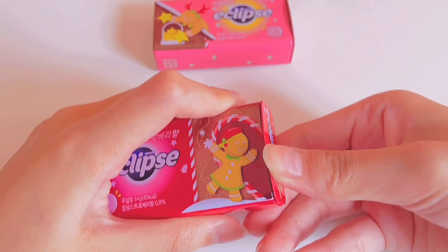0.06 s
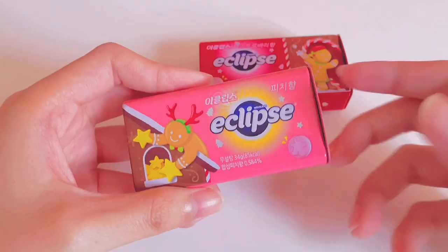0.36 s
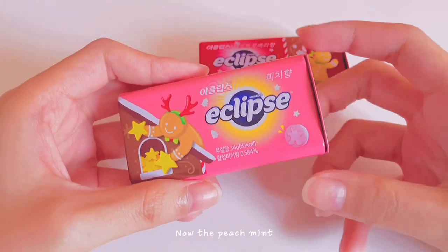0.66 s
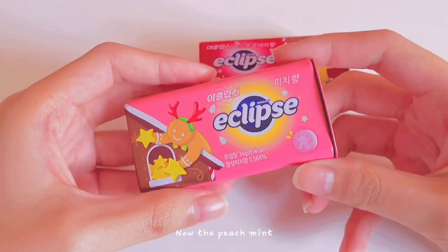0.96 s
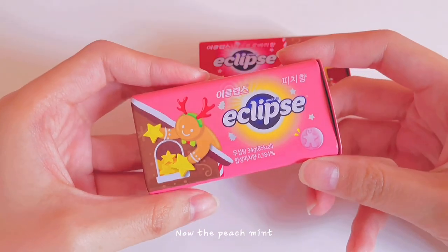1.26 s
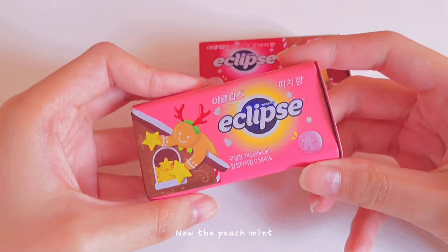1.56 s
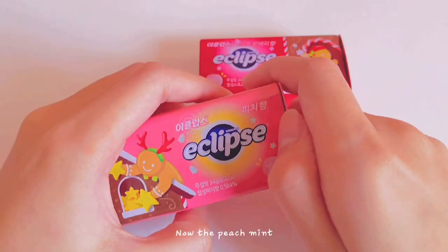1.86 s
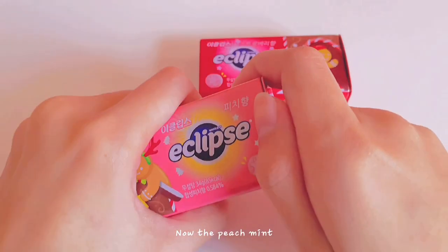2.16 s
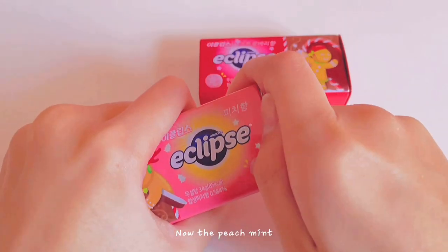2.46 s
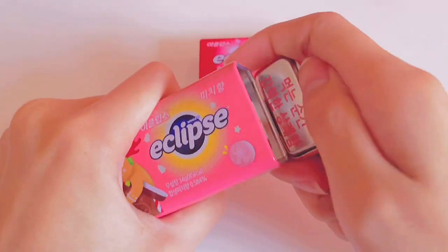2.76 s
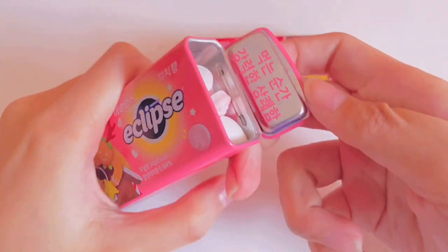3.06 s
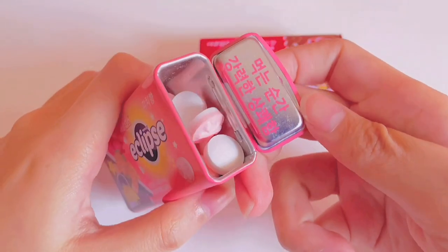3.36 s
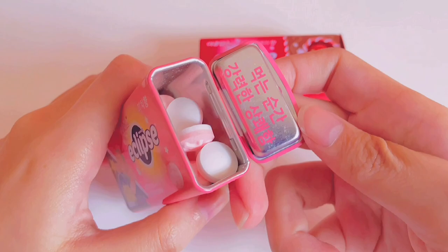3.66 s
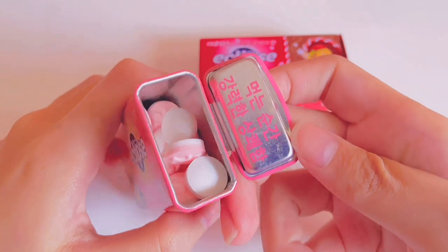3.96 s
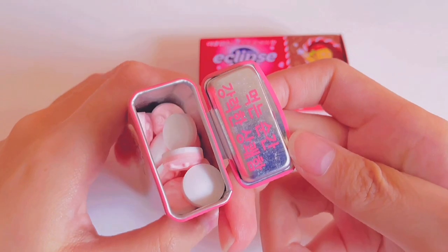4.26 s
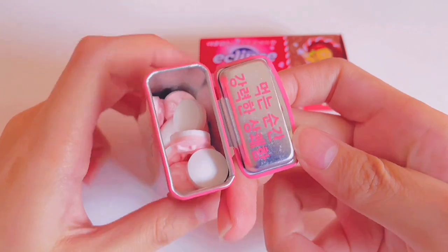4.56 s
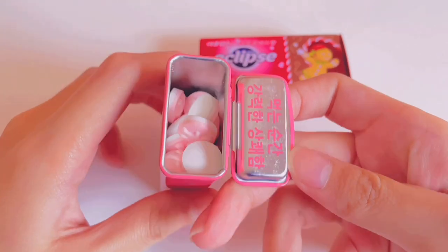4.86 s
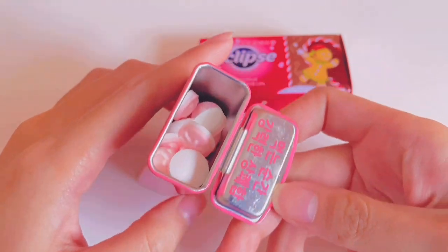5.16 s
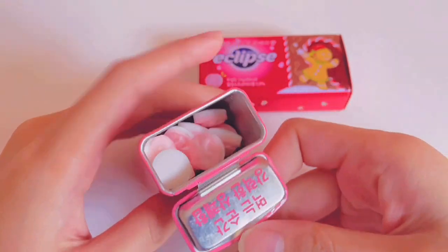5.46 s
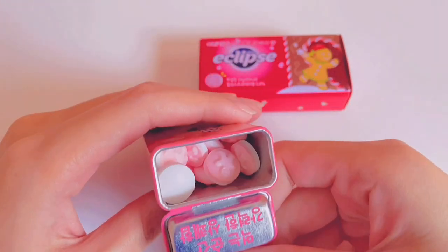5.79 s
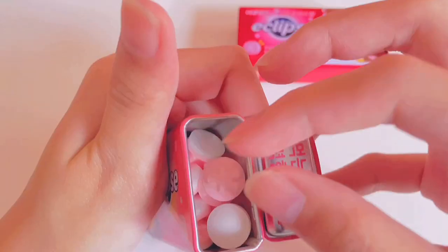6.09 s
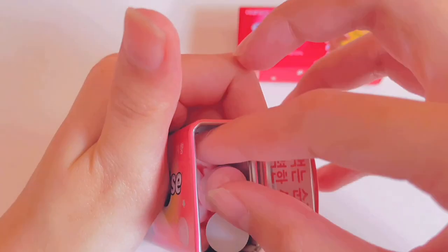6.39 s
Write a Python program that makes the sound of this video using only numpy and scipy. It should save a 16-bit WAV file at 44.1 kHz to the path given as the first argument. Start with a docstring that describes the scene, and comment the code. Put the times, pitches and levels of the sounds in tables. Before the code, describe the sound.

Nails tick on a small metal tin, its hinged lid pops open and mints rattle inside, over a steady fan hum.

```python
"""Small hinged mint tins, handled close to a stereo microphone in a small room. A lid scrapes over its
catch, pops open and clinks against its stop, ringing the thin sheet metal; mints tumble in the tilted
tin and knock its hollow. Nails tick on the walls, and skin slides and squeaks on the paint.
Right at the microphone the moving hands thud softly; behind them a fan hums steadily."""
import sys
import numpy as np
from scipy import signal
from scipy.fft import rfft, irfft, next_fast_len
from scipy.io import wavfile
from scipy.ndimage import uniform_filter1d, map_coordinates

SR = 44100
rng = np.random.default_rng(int(sys.argv[2]) if len(sys.argv) > 2 else 0)


def materialize(psi):
    """Save the field psi as 16-bit PCM at rate SR to the path in sys.argv[1].

    A 1-D psi becomes a single channel; in a 2-D psi each row is a channel.
    """
    bounded = np.clip(np.atleast_2d(psi).T, -1, 1)
    quanta = np.round(bounded * 32767).astype(np.int16)
    wavfile.write(sys.argv[1], SR, quanta)


N = 287973

# how alike noise is in the two channels: frequency_hz, correlation
STEREO_LIKENESS = [(60, 0), (150, 0.55), (200, 0.88), (340, 0.92), (450, 0.27), (740, 0.13), (1200, 0.53),
                   (2000, 0.049), (9000, 0)]
# tone of the room's reverberation: frequency_hz, density_db
ROOM_SPECTRUM = [(200, -11), (550, -2), (1020, 7.5), (1500, 1.5), (2500, 0), (4000, -4), (6000, -10),
                 (8000, -6), (11500, -17.5), (14000, -20), (16000, -29)]
# reverberation time of the room: frequency_hz, t60_s
ROOM_DECAY = [(300, 0.82), (2500, 0.47), (6000, 0.47), (12000, 0.3)]
# the fan's rush of air: frequency_hz, density_db
FAN_SPECTRUM = [(30, -24), (110, -10), (185, 3), (350, -1), (430, -2), (660, -11), (820, -11), (1230, -5.5),
                (1480, -17.5), (2100, -20), (3200, -33), (5000, -43.5), (8000, -84), (13000, -81)]
# narrow resonances of the fan's casing: centre_hz, width_hz, level_db
CASING_PEAKS = [(200.4, 3.9, 3.5), (302.2, 6.1, 4.5), (360.7, 7.7, -1.5), (791, 65, -8.5), (1138, 29, -8.5)]

# low rustle of the moving hands: time_s, level_db
RUMBLE_LEVELS = [(0.0, -46.5), (0.29, -54), (0.56, -46), (0.73, -47.5), (0.87, -57.5), (2.85, -52),
                 (3.13, -60), (3.33, -52.5), (3.8, -48), (3.93, -48), (4.29, -47.5), (4.48, -58),
                 (5.5, -57.5), (6.05, -51.5), (6.53, -43.5)]
# tone of that rustle: frequency_hz, density_db
RUMBLE_SPECTRUM = [(20, -20), (35, -18), (52, -0.5), (75, -9.5), (110, -9.5), (170, -20.5), (400, -89)]
# fingers slide over the paint: middle_s, level_db, half_length_s
STROKES = [(0.556, -69.5, 0.095), (0.859, -69.5, 0.016), (1.236, -70, 0.019), (1.805, -68.5, 0.049),
           (2.113, -66, 0.075), (2.347, -70, 0.053), (2.87, -63, 0.076), (3.07, -74.5, 0.16),
           (4.873, -70, 0.13), (5.881, -72, 0.092), (6.297, -69.5, 0.13)]
# hiss of sliding skin: frequency_hz, density_db
SKIN_SPECTRUM = [(800, -27), (2500, 2), (5000, 1.5), (7500, 0.5), (10000, 1), (12500, 1.5), (14000, -3),
                 (16000, 2)]
# fingertips rub the open tin as they turn it: time_s, level_db
RUB_LEVELS = [(3.5, -65), (3.75, -45), (4.4, -77), (4.65, -61), (4.88, -40.5), (5.3, -45.5), (5.6, -47),
              (6.1, -61)]
# tone of the rubbed hollow: frequency_hz, density_db
RUB_SPECTRUM = [(100, -27), (180, 3), (240, 8), (360, 6.5), (460, 4), (560, -8.5), (700, -3), (2000, -51.5)]
# soft thuds of the hands at the microphone: middle_s, level_db, pitch_hz, half_length_s
THUDS = [(0.403, -20.5, 88.5, 0.0078), (0.43, -20.5, 126, 0.013), (0.463, -23, 57.4, 0.014),
         (0.553, -26, 79, 0.0053), (1.434, -35.5, 59, 0.01), (2.118, -30, 81.5, 0.012),
         (2.213, -28.5, 91.5, 0.0091), (2.435, -19.5, 91, 0.0095), (2.741, -32.5, 71.6, 0.015),
         (3.485, -34, 62, 0.025), (3.802, -22, 139, 0.0033), (3.827, -25, 56, 0.012),
         (3.922, -25, 69, 0.0062), (4.201, -31.5, 61, 0.0091), (4.386, -34, 79, 0.022),
         (5.161, -37, 62, 0.011), (5.266, -30.5, 55.5, 0.012), (5.687, -37, 55, 0.015),
         (5.762, -29, 101, 0.0043), (6.402, -24, 64, 0.014)]
# the dull puff in each thud: frequency_hz, density_db
PUFF_SPECTRUM = [(60, -9.0), (160, -0.5), (230, -5.0), (450, -23.0), (1500, -67.5)]
# skin sticks on the paint: middle_s, level_db, pitch_hz, half_length_s, jitter_ratio, octave_db
SQUEAKS = [(0.328, -48, 5170, 0.01, 0.035, 8), (4.937, -40, 5200, 0.00097, 0.14, -9),
           (6.404, -52, 6650, 0.0016, 0.089, -6)]

# the tin's sheet-metal walls: frequency_hz, level_db, t60_s
WALL_MODES = [(876, -9.5, 0.33), (960, -3, .3), (1144, 2, 0.36), (1684, 3, 0.25), (1820, 5, .12),
              (1890, -4.5, 0.12), (2090, -4.5, .14), (2190, -0.5, 0.14), (2396, 9, 0.15), (2520, 0.5, 0.16),
              (2720, -7, .12), (2870, -1, 0.17), (3190, 1, 0.19), (3320, -4, .1), (3570, -6, 0.1),
              (3770, -11.5, 0.16), (4010, -3.5, 0.24), (5150, -13.5, .2), (5360, -5.5, 0.25),
              (5660, -4, 0.11), (7500, -7, .15), (9000, -14, .25), (9800, -6.5, .22)]
# the hollow of the open tin: frequency_hz, level_db, t60_s
HOLLOW_MODES = [(147, -7.5, 0.083), (295, -0.5, 0.038), (554.5, 0, 0.061), (920, -9.5, 0.059),
                (1182, -11, 0.063), (1434, -10.5, 0.037), (1770, -14.5, .035)]
# a panel springing back, damped by the hand: frequency_hz, level_db, t60_s
PANEL_MODES = [(323, -16.5, 0.045), (412, -20, 0.032), (600, -19.5, 0.014), (753, -10, 0.024),
               (962, 4.5, 0.014), (843, -9, 0.051), (1085, -22, 0.078), (1700, -23.5, 0.046),
               (2060, -26, 0.03), (3285, -13.5, 0.028), (3550, -15, 0.035)]
# the open lid: frequency_hz, level_db, t60_s
LID_MODES = [(1790, 8, .035), (2425, 7, .06), (2850, -10, .18), (3630, -11, .05), (4500, -3, .018),
             (5325, -7.5, .15), (5800, 2, .018), (6420, -8, .04), (6900, -10, .02), (9300, -4, .018),
             (10200, -1, .014), (11750, -4, .03)]
# nails tick on the gripped tin: start_s, level_db, pitch_hz, brightness_db
NAIL_TICKS = [(0.237, -63.5, 6000, 10), (0.2462, -43.5, 3960, 4), (0.256, -50, 5000, -3),
              (0.352, -51.5, 6300, 6), (0.453, -60.5, 4300, -2.5), (1.2862, -73, 4530, -6),
              (1.544, -63.5, 3550, -12), (2.288, -57.5, 3540, -3), (2.317, -61.5, 3420, -2.5),
              (2.33, -61, 3400, -5), (2.502, -50.5, 4040, 13), (2.5385, -57.5, 7250, 6.5),
              (2.5486, -46.5, 2840, -3), (2.558, -61.5, 4000, 9), (2.65, -56, 4400, -7.5),
              (2.891, -67, 6900, 15), (2.9386, -56, 3200, -3), (2.978, -58, 3120, 0),
              (3.066, -58, 3130, 4.5), (3.15, -55.5, 4600, 0), (3.395, -53, 4600, -4.5),
              (3.981, -53.5, 3200, -4.5), (4.002, -64, 4700, -3), (4.2447, -74, 4900, 1),
              (4.346, -70, 4600, -2), (4.711, -60, 6400, -2), (4.785, -53.5, 3550, 0.5),
              (4.865, -62, 6000, 2), (5.525, -55, 2660, -4), (5.749, -53.5, 2900, 6)]
# tin and room already ring at the start; later one tap rings out: start_s, level_db, pitch_hz, walls_db
WALL_RINGS = [(0.002, -49.5, 6030, 3), (0.04, -50.5, 5640, -6), (1.651, -55.5, 3110, 10)]
# a nail drags along the rim: start_s, level_db, pitch_hz
RIM_DRAGS = [(2.083, -64, 3570), (2.094, -54, 3440), (2.106, -55.5, 3400)]
# mints tumble in the open tin: start_s, level_db, pitch_hz, brightness_db, knock_db, ping_db
MINT_HITS = [(4.6939, -42, 4400, -3, -18.5, -13), (4.856, -71, 2970, 2, -28, -10),
             (5.2513, -38, 2930, -6, -24.5, -2), (5.257, -40, 3980, 9, -27.5, -8),
             (5.2603, -40.5, 5720, -3.5, -58, -2), (5.2753, -46.5, 4040, 2.5, -36, -19),
             (5.335, -42.5, 4200, 0.5, -47, -11), (5.3376, -34, 4300, 0, -52, -3),
             (5.3682, -37.5, 10540, 9.5, -62, 4), (5.447, -51, 3880, 2.5, -65.5, -12),
             (5.451, -54, 4270, 0, -58, -7), (5.456, -49.5, 4500, 2, -58, -12)]
# the lid slips over its catch: start_s, level_db, pitch_hz, body_db, sparkle_db
CATCH_SLIPS = [(2.4045, -25.5, 3440, -5.5, -3.5), (2.4096, -26, 3440, -5, -1.5),
               (2.414, -27.5, 2130, 0.5, -2.5), (2.4241, -34, 2470, 8.5, -12), (2.4446, -41, 5640, -5, 5),
               (2.4478, -44, 5600, -1, 4.5)]
# a panel pops, loudest as the lid clears its catch: start_s, level_db
PANEL_POPS = [(2.4058, -4), (5.339, -24)]
# the open lid strikes its stop: start_s, level_db, pitch_hz, ring_db, ring_centre_hz
LID_STOPS = [(3.174, -31, 6140, -33.5, 3740), (3.281, -44.5, 2430, -53, 2600),
             (3.284, -46, 3660, -51, 4000), (3.3206, -43, 1260, -52.5, 5260),
             (5.3897, -34, 4170, -42, 6500)]

# treble dips in the sum (mid) and the difference (side) of the two channels: frequency_hz, gain_db
MID_DIPS = [(6600, 0), (7900, -11.0), (9200, -3.0), (10400, -4.0), (12300, -7.0), (13800, -18.5),
            (16000, -15.5)]
SIDE_DIPS = [(6500, 0.5), (9500, -5.5), (10600, -18.0), (12200, -20), (13600, -4.0), (16000, -2.0)]

THUD_SAG_S = 0.091  # a thud's pitch falls by a factor e in this time
TWIN_GAP = .006  # relative gap between twin modes of the nearly symmetric tin
FOCUS_DB_PER_OCTAVE = 8
SHIMMER_LOW_HZ, SHIMMER_TOP_HZ, SHIMMER_T60_S = 6870, 13060, 0.31
DIP_START_S, DIP_END_S, TOP_HZ = 5.959, 5.968, 16400


def amp(db):
    """Decibels to gain."""
    return 10 ** (np.asarray(db) / 20)


def unit(x):
    """Scale to rms 1."""
    return x / np.sqrt(np.mean(x ** 2) + 1e-20)


def packet(x):
    """Scale a stereo burst to the energy of 10 ms at rms 1."""
    return unit(x) * np.sqrt(.01 * SR / x.shape[-1])


def apart(value):
    """Plus the value on the left, minus it on the right."""
    return value * np.array([[1], [-1]])


def fade(t, t60):
    """Exponential decay, 60 dB down at t60."""
    return np.exp(-np.log(1000) * t / t60)


def swell(t, half_s):
    """A smooth rise and fall around t = 0."""
    return 1 / np.cosh(np.clip(1.3 * t / half_s, -20, 20))


def along(points, hz):
    """Interpolate (frequency_hz, value) points on a log axis."""
    knots_hz, values = np.transpose(points)
    return np.interp(np.log(hz + 1), np.log(knots_hz + 1), values)


def curve(points):
    """Turn (frequency_hz, level_db) points into gain as a function of frequency."""
    return lambda hz: amp(along(points, hz))


def wobble(knots_per_s):
    """A smooth random curve."""
    knots = rng.standard_normal(int(N * knots_per_s / SR) + 4)
    return map_coordinates(knots, [np.arange(N) * knots_per_s / SR])


def filtered(x, response):
    """Apply a gain that depends on frequency."""
    n = x.shape[-1]
    padded = next_fast_len(n + 8192)
    return irfft(rfft(x, padded) * response(np.fft.rfftfreq(padded, 1 / SR)), padded)[..., :n]


def rush(gain):
    """Stereo noise of rms 1, its channels most alike in the low mids and unrelated in the treble."""
    def mid_side_gain(hz):
        angle = np.arccos(np.clip(along(STEREO_LIKENESS, hz), -1, 1)) / 2
        return gain(hz) * np.array([np.cos(angle), np.sin(angle)])
    mid, side = filtered(rng.standard_normal((2, N)), mid_side_gain)
    return unit(np.array([mid + side, mid - side]))


def add(track, start_s, sound):
    """Mix a sound into the track from start_s on."""
    start = max(round(start_s * SR), 0)
    part = track[:, start:start + sound.shape[-1]]
    part += sound[..., :part.shape[-1]]


def room_tail(t, colour_db, build_s):
    """Reflections in the small room build into diffuse noise whose treble dies first."""
    hz, frame_s, spectrum = signal.stft(rng.standard_normal((2, len(t))), SR, nperseg=256)
    spectrum = spectrum * amp(colour_db(hz))[:, None] * fade(frame_s, along(ROOM_DECAY, hz)[:, None])
    tail = signal.istft(spectrum, SR, nperseg=256)[1][:, :len(t)]
    return tail * (1 - np.exp(-t / build_s))


def room_answer(t, pitch_hz, build_s):
    """The room answers a contact with a tail that carries its pitch."""
    def colour_db(hz):
        return along(ROOM_SPECTRUM, hz) + 5.5 * np.exp(-((hz / pitch_hz - 1) / .1) ** 2)
    return packet(room_tail(t, colour_db, build_s))


def reverb(sound):
    """The room holds on to a short ring, with weaker treble."""
    t = np.arange(SR // 2) / SR
    tail = room_tail(t, lambda hz: along([(5500, 0), (11000, -8)], hz), build_s=.006)
    return signal.fftconvolve(sound, tail / np.linalg.norm(tail[0]), axes=1)[:, :sound.shape[-1]]


def fan():
    """In the background, a steady rush of air hums in the narrow resonances of the fan's casing."""
    def gain(hz):
        casing_power = sum(amp(db) ** 2 / (1 + (2 * (hz - centre_hz) / width_hz) ** 2)
                           for centre_hz, width_hz, db in CASING_PEAKS)
        return np.sqrt(amp(along(FAN_SPECTRUM, hz)) ** 2 + amp(11.0) * casing_power)
    return amp(-40.5 + 0.86 * wobble(5.098)) * rush(gain)


def hands():
    """Close up, the hands stir a lumpy rumble, slide grainily over the paint and rub the open tin."""
    t = np.arange(N) / SR
    rumble_db = np.interp(t, *np.transpose(RUMBLE_LEVELS)) + 6.0 + 4.17 * wobble(13)
    rumble = amp(rumble_db) * rush(curve(RUMBLE_SPECTRUM))
    sliding = sum(amp(db + 1) * np.exp(-.5 * ((t - s) / half_s) ** 2) for s, db, half_s in STROKES)
    grain = unit(amp(2.5 * wobble(900) + 1.2 * wobble(40)))
    skin = sliding * grain * rush(curve(SKIN_SPECTRUM))
    rub_db = np.interp(t, *np.transpose(RUB_LEVELS)) + 4.04 * wobble(18)
    rub = amp(rub_db) * rush(curve(RUB_SPECTRUM))
    return rumble + skin + rub


def thuds():
    """Hand thuds push the two microphone ports out of step, sagging in pitch as the flesh gives."""
    out = np.zeros((2, N))
    t = (np.arange(SR // 5) - SR // 10) / SR
    for middle_s, db, hz, half_s in THUDS:
        phase = rng.uniform(0, 2 * np.pi) + apart(.7) * rng.choice([-1, 1])
        cycles = hz * THUD_SAG_S * (1 - np.exp(-t / THUD_SAG_S))
        puff = unit(filtered(rng.standard_normal((2, len(t))), curve(PUFF_SPECTRUM)))
        thud = np.sin(2 * np.pi * cycles + phase) + amp(-9.5) * puff
        add(out, middle_s + t[0], amp(db) * swell(t, half_s) * thud)
    return out


def squeaks():
    """Skin sticks and slips on the paint in a short unsteady whistle with its octave."""
    out = np.zeros((2, N))
    t = np.arange(N) / SR
    for middle_s, db, hz, half_s, jitter, octave_db in SQUEAKS:
        phase = 2 * np.pi * np.cumsum(hz * (1 + jitter * wobble(2400))) / SR + apart(.7)
        whistle = np.sin(phase) + amp(octave_db) * np.sin(2 * phase)
        out += amp(db) * swell(t - middle_s, half_s) * whistle
    return out


def focus(modes, pitch_hz):
    """A contact excites a mode less the farther it lies from the pitch of the contact."""
    return [(hz, db - FOCUS_DB_PER_OCTAVE * abs(np.log2(hz / pitch_hz)), t60) for hz, db, t60 in modes]


def ring(t, modes, scatter_db, detune=0):
    """Sheet metal rings in beating twin modes, shifted by the grip, each with its own stereo phase."""
    hz, db, t60 = np.transpose(modes)
    hz = hz * (1 + detune * rng.standard_normal(len(hz)))
    hz, db, t60 = np.r_[hz, hz * (1 + TWIN_GAP)], np.r_[db, db - 6], np.r_[t60, t60]
    gain = amp(db + scatter_db * rng.standard_normal(len(hz)))
    phase = rng.uniform(0, 2 * np.pi, len(hz)) + apart(rng.uniform(-0.42, 1, len(hz)))
    partials = np.sin(2 * np.pi * hz[:, None] * t + phase[..., None]) * fade(t, t60[:, None])
    return packet(gain @ partials)


def clack(hz, contact_s, body_db, sparkle_db, body_hz, ping_db):
    """The struck spot pings in a burst of dense, damped vibration, with body below and sparkle above."""
    t = np.arange(SR // 12) / SR
    force = t / contact_s * np.exp(-2 * t / contact_s) + amp(-10.5) * np.exp(-t / (3 * contact_s))
    phase = rng.uniform(0, 2 * np.pi, (2, 1))
    ping = np.sin(2 * np.pi * hz * t + phase) * fade(t, t60=.014) * (1 - np.exp(-2 * t / contact_s))
    out = amp(ping_db) * packet(ping)
    bands = [(body_hz, 2500, body_db), (2500, 7000, -3.5), (.9 * hz, 1.1 * hz, -7),
             (7000, 14500, sparkle_db)]
    for low_hz, high_hz, db in bands:
        band = signal.butter(3, [low_hz, high_hz], "band", fs=SR, output="sos")
        out += amp(db) * packet(signal.sosfilt(band, force * rng.standard_normal((2, len(t)))))
    return out


def contact(hz, body_db, sparkle_db, contact_s, walls_db, room_db,
            detune=0.045, body_hz=700, ping_db=-4, build_s=0.0053):
    """One contact clacks and sets the tin and the room ringing, a little left of centre."""
    t = np.arange(SR * 2 // 5) / SR
    walls = ring(t, focus(WALL_MODES, hz), scatter_db=2.5, detune=detune)
    out = amp(walls_db) * walls + amp(room_db) * room_answer(t, hz, build_s)
    add(out, 0, amp(-2.0) * clack(hz, contact_s, body_db, sparkle_db, body_hz, ping_db))
    return out * amp(apart(.55))


def blows(events, modes, attack_s, spread_rad, left_db):
    """Blunt blows ring a few damped modes, each reaching the two channels out of step."""
    out = np.zeros((2, N))
    t = np.arange(SR // 5) / SR
    attack = 1 - np.exp(-(t / attack_s) ** 2)
    for start_s, db in events:
        for hz, mode_db, t60 in modes:
            phase = 2 * np.pi * hz * t + apart(spread_rad * rng.uniform(.7, 1.3))
            add(out, start_s, amp(db + mode_db) * np.sin(phase) * fade(t, t60) * attack)
    return out * amp(apart(left_db))


def nails():
    """Tin and room already ring at the start; then nails tick, one tap rings out and a nail drags."""
    out = np.zeros((2, N))
    for start_s, db, hz, bright_db in NAIL_TICKS:
        tick = contact(hz, body_db=3.0 - bright_db, sparkle_db=bright_db - 3.0, contact_s=0.0014,
                       walls_db=-8, room_db=-1.5)
        add(out, start_s, amp(db) * tick)
    for start_s, db, hz, walls_db in WALL_RINGS:
        ringing = contact(hz, body_db=6, sparkle_db=-0.5, contact_s=0.0021,
                          walls_db=walls_db, room_db=15.5, detune=0, ping_db=-2)
        add(out, start_s, amp(db) * ringing)
    for start_s, db, hz in RIM_DRAGS:
        drag = contact(hz, body_db=1, sparkle_db=7.5, contact_s=0.0027, walls_db=-16, room_db=-9.0)
        add(out, start_s, amp(db) * drag)
    return out


def mints():
    """Tumbling mints click on the wall and knock the hollow; shorter contacts sound brighter."""
    knocks = [(start_s, knock_db) for start_s, *_, knock_db, _ in MINT_HITS]
    hollow = blows(knocks, HOLLOW_MODES, attack_s=0.00084, spread_rad=0.66, left_db=0.5)
    out = hollow + amp(-12) * reverb(hollow)
    for start_s, db, hz, bright_db, _, ping_db in MINT_HITS:
        click = contact(hz, body_db=1.0 - bright_db, sparkle_db=bright_db - 2.5, ping_db=ping_db,
                        contact_s=0.0016 * amp(-.5 * bright_db), walls_db=-15.5, room_db=-2.5)
        add(out, start_s, amp(db) * click)
    return out


def catch():
    """The lid scrapes over its catch and chatters free in ever weaker slips."""
    out = np.zeros((2, N))
    for start_s, db, hz, body_db, sparkle_db in CATCH_SLIPS:
        slip = contact(hz, body_db, sparkle_db, contact_s=0.0012, walls_db=-3.5, room_db=-1.5,
                       detune=0, body_hz=1400, ping_db=-6, build_s=0.0041)
        add(out, start_s, amp(db) * slip)
    return out


def shimmer(t):
    """Many close upper modes of the thin sheet glitter on after a pop."""
    modes = [(hz, 0, SHIMMER_T60_S) for hz in rng.uniform(SHIMMER_LOW_HZ, SHIMMER_TOP_HZ, size=45)]
    return ring(t, modes, scatter_db=3)


def lid():
    """A flexing panel pops, thumping the air inside and ringing the walls; the lid clinks on its stop."""
    t = np.arange(SR // 2) / SR
    panel = blows(PANEL_POPS, PANEL_MODES, attack_s=0.00099, spread_rad=0.57, left_db=1.8)
    hollow = blows(PANEL_POPS, HOLLOW_MODES, attack_s=0.0015, spread_rad=0.84, left_db=2.5)
    out = amp(1.5) * panel + amp(-27.5) * hollow
    for start_s, db in PANEL_POPS:
        add(out, start_s, amp(db - 26) * ring(t, WALL_MODES, scatter_db=1.5))
        add(out, start_s, amp(db - 35.5) * shimmer(t))
    for start_s, db, hz, ring_db, ring_hz in LID_STOPS:
        strike = contact(hz, body_db=-1.5, sparkle_db=-2.5, contact_s=0.002, walls_db=-22, room_db=-7)
        add(out, start_s, amp(db) * strike)
        clink = amp(ring_db) * ring(t, focus(LID_MODES, ring_hz), scatter_db=1.5)
        add(out, start_s, clink + amp(-14.5) * reverb(clink))
    return out


def scene():
    """At the microphone: the fan behind, the hands and tins close in front."""
    return fan() + hands() + thuds() + catch() + lid() + mints() + squeaks() + nails()


def record(dry):
    """The treble has dips in the channels' sum and difference; the level dips once; the top is cut."""
    mid = filtered((dry[0] + dry[1]) / 2, curve(MID_DIPS))
    side = filtered((dry[0] - dry[1]) / 2, curve(SIDE_DIPS))
    t = np.arange(N) / SR
    dip = uniform_filter1d(1.0 * ((t < DIP_START_S) | (t > DIP_END_S)), size=40)
    return filtered(dip * np.array([mid + side, mid - side]), lambda hz: hz < TOP_HZ)


dry = scene()
out = record(dry)
materialize(out)
```